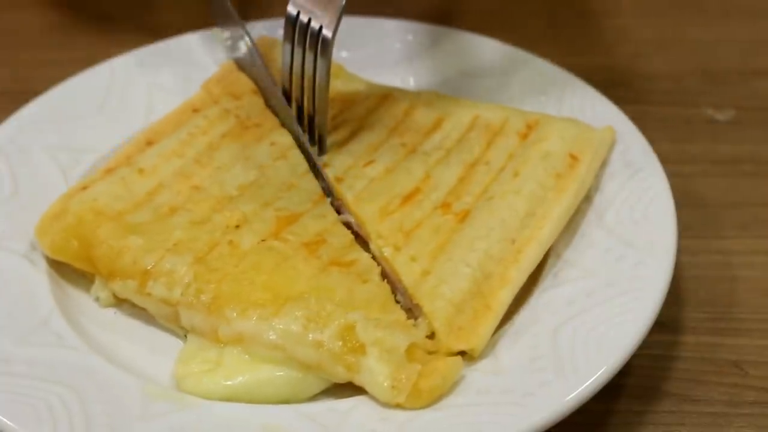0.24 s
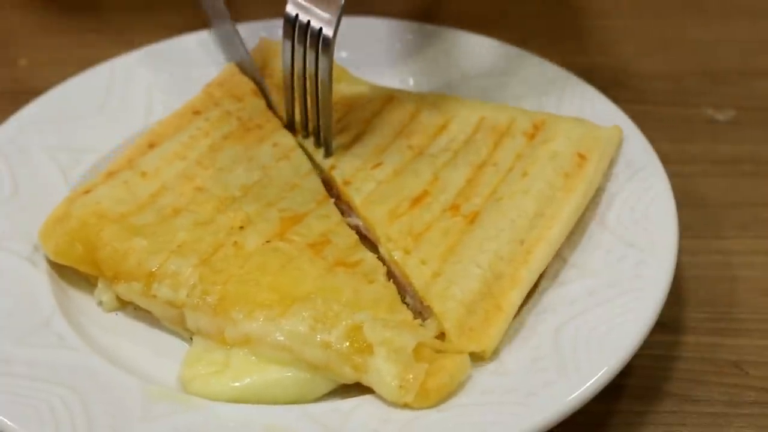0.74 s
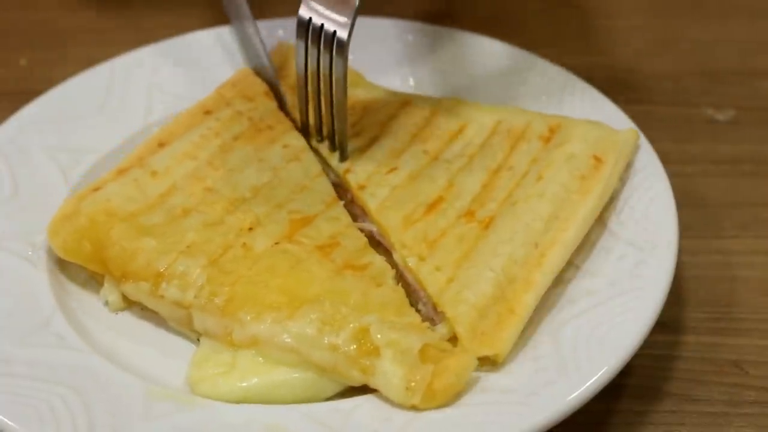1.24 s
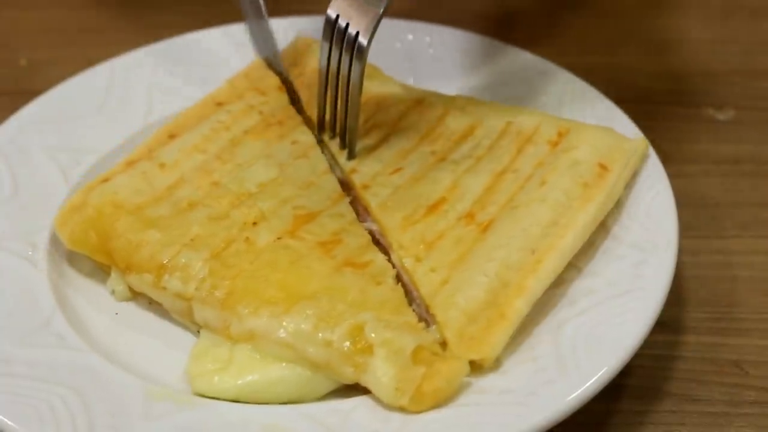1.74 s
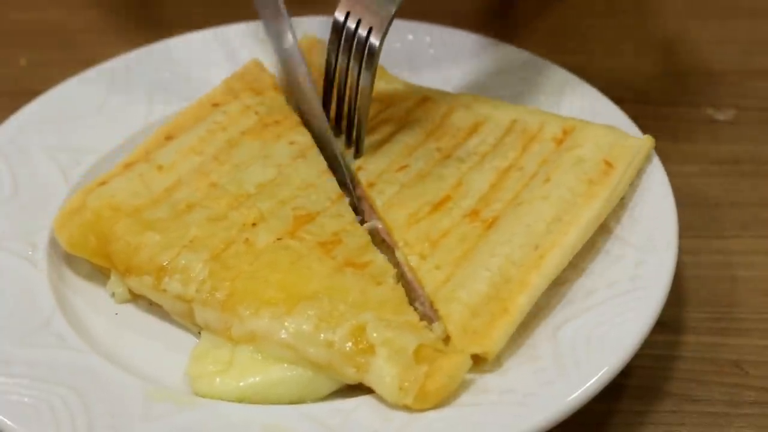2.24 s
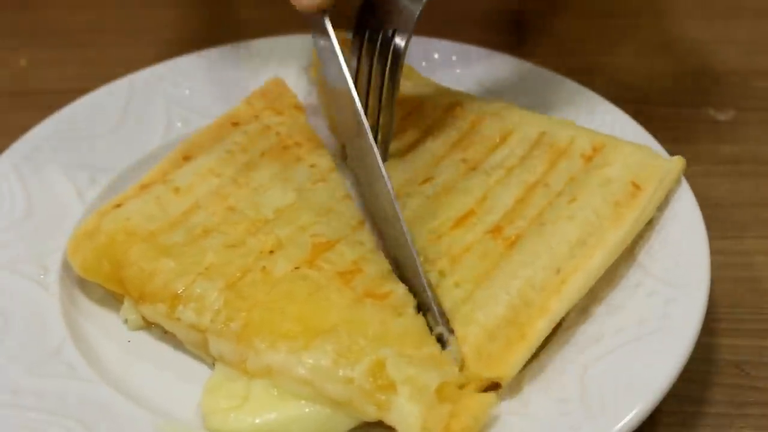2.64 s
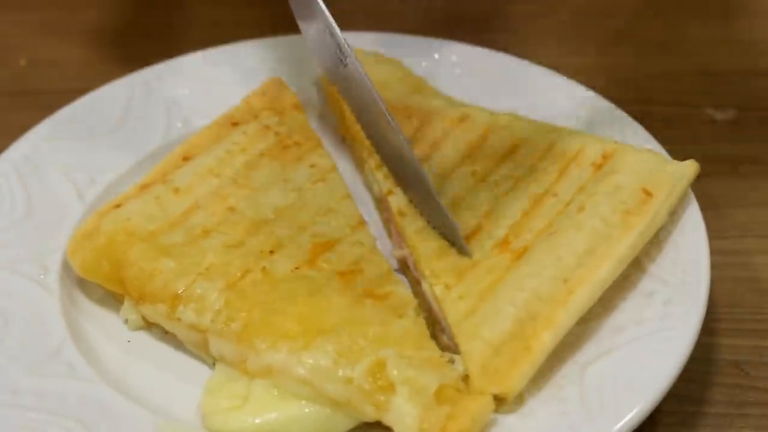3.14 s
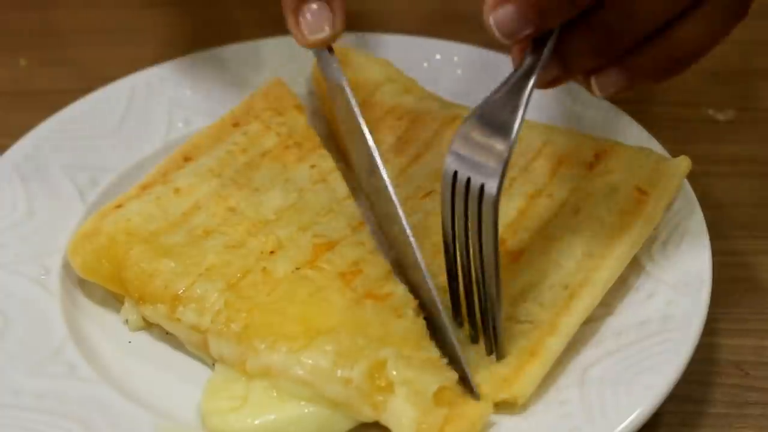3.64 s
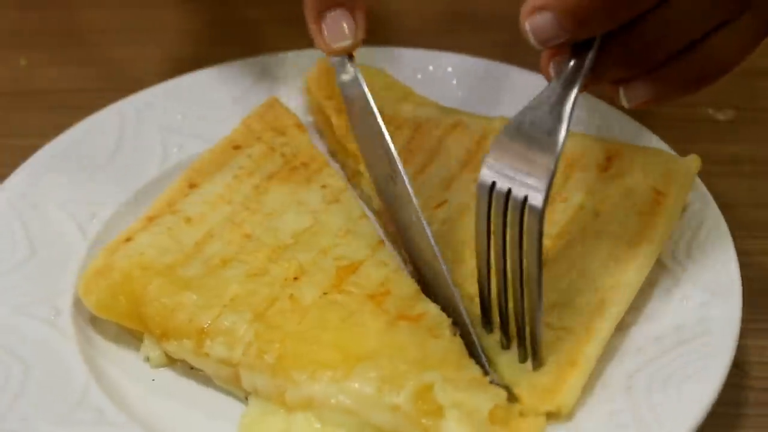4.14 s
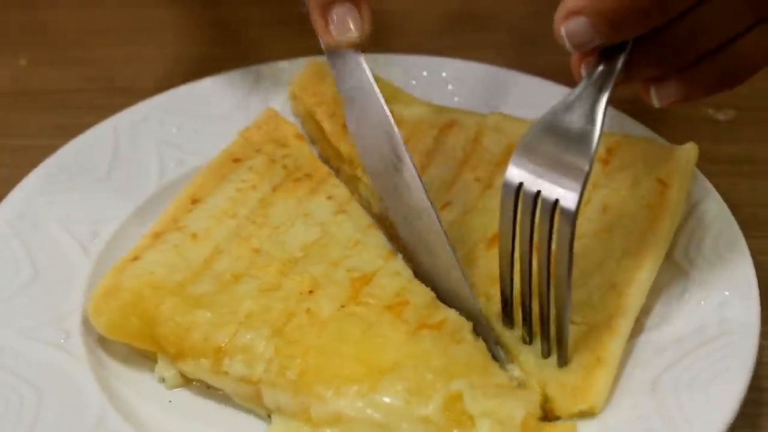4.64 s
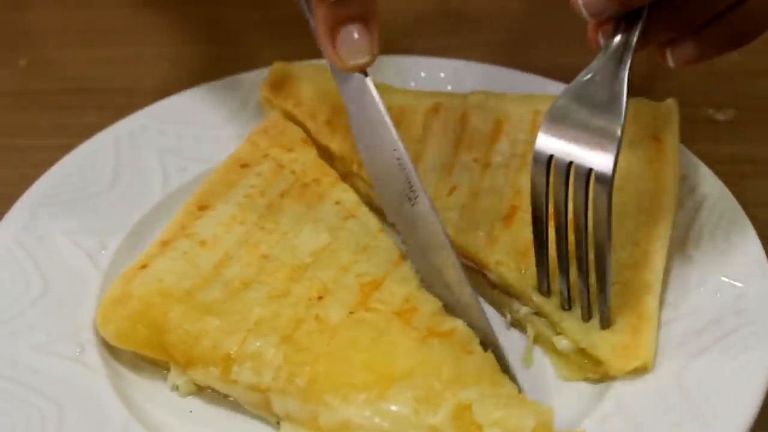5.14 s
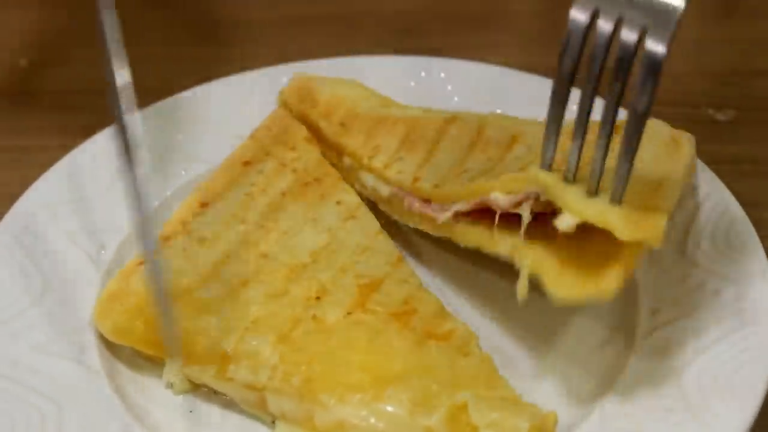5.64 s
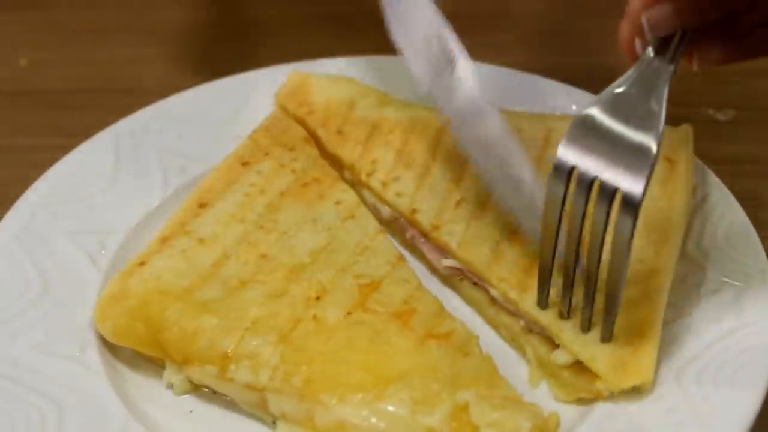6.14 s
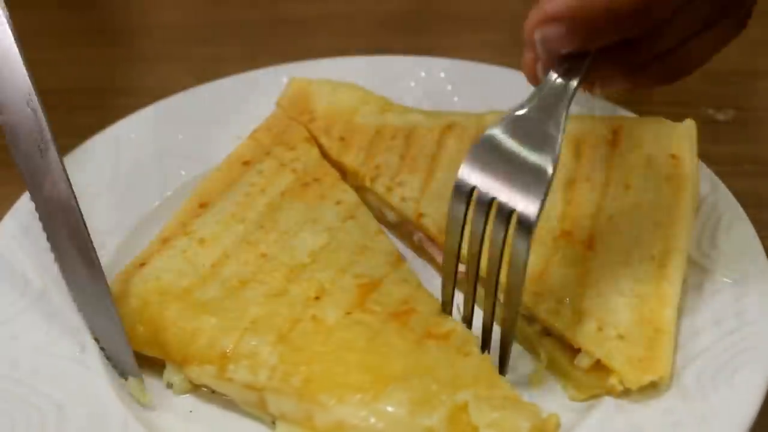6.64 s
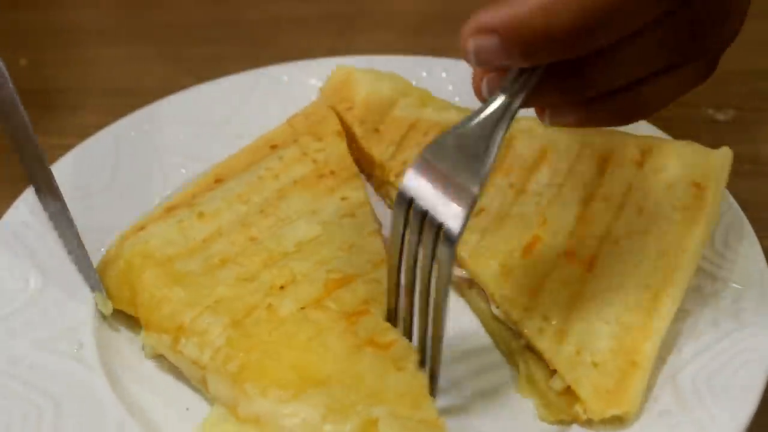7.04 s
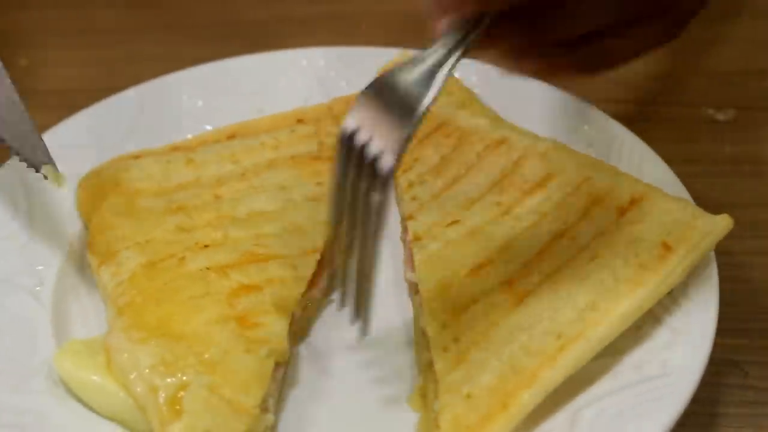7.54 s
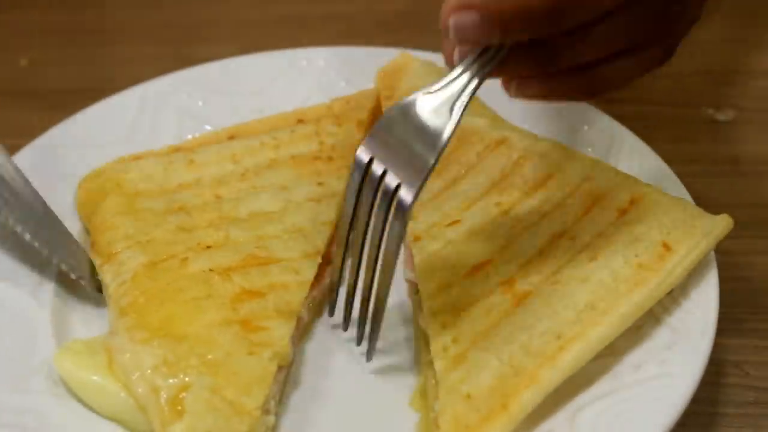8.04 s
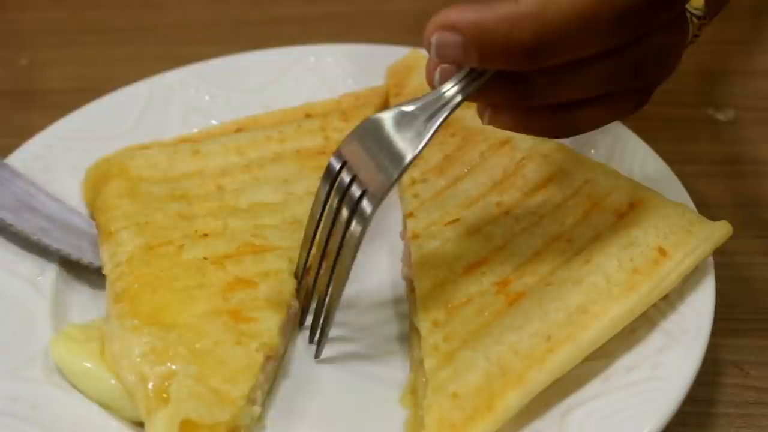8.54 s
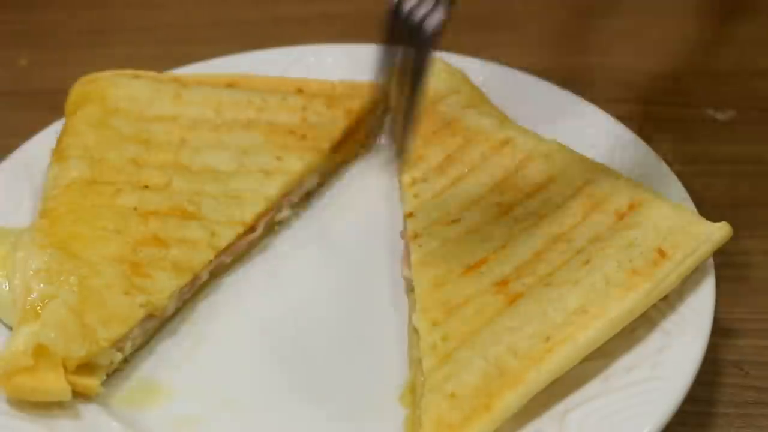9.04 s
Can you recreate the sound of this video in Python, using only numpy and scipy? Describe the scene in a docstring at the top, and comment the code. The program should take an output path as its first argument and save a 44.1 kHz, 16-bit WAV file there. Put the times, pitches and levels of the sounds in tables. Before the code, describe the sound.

Close cutlery clatters and scrapes on a plate as toasted bread is cut, then quieter rubs, taps and short squeaks in a hard-walled room.

```python
"""In a bare, ringing room, a table knife saws through a toasted sandwich on a ceramic plate while a fork holds it.
Then the halves are pushed apart. Rubbing dough and crackling crust are filtered noise with tiny clicks.
The blade knocks on the plate and knife and fork clink: each contact is a set of decaying modes with a short crack.
Knife or fork squeaks across the glaze as an unsteady pulse train; crust and cheese snap faintly as the filling parts.
One close microphone hears it all with a dense room tail, low rumble and hiss."""
import sys
import numpy as np
from scipy import signal
from scipy.fft import rfft, irfft, next_fast_len
from scipy.io import wavfile

SR = 44100
rng = np.random.default_rng(int(sys.argv[2]) if len(sys.argv) > 2 else 0)


def to_wav(sig):
    """Store sig (one row per channel, or 1-D mono) as 16-bit WAV at the path in sys.argv[1].

    Samples outside -1..1 are clipped; the rate is SR.
    """
    pcm = np.clip(np.atleast_2d(sig), -1, 1) * 32767
    pcm = np.round(pcm).astype(np.int16)
    wavfile.write(sys.argv[1], SR, pcm.T)  # frames by channels


N = 409248
TIME = np.arange(N) / SR

# knife strokes through the sandwich, levels before the mix in sawing():
# (start [s], length [s], rubbing [dB], pressure re rubbing [dB], crispness re rubbing [dB])
STROKES = [(-.04, 0.059, -41.5, 5, 5), (.04, 0.16, -53.5, -5, 1), (.26, 0.063, -43.5, -1, 6.5),
           (.52, 0.36, -49, -3, -4), (.71, .14, -42, -1.5, -6), (.92, 0.16, -53.5, 1.5, -2),
           (1.12, 0.28, -56, 2, -1), (1.47, 0.16, -44.5, -4, -59), (1.73, 0.15, -53.5, 7, 3.5),
           (1.9, 0.24, -53, 4.5, -7), (2.09, 0.13, -48.5, 0.5, -5.5), (2.25, 0.098, -57, -3, -10),
           (2.36, 0.2, -65.5, -4.5, 17), (2.565, 0.088, -47, -2.5, 4), (3.86, 0.18, -51, -23, -5),
           (4.09, 0.089, -45.5, -18, -1), (4.19, 0.16, -54, -6, -2.5), (4.35, 0.23, -45.5, -16, -1),
           (4.6, 0.12, -54, -12, -1), (4.72, 0.083, -51, 3, 1.5), (4.86, 0.18, -57, 0, 6.5),
           (5.04, 0.14, -59, 0, -1), (5.2, 0.054, -49.5, 4.5, 4.5), (5.29, 0.065, -61, 6, 4)]
# the sandwich pricked, lifted or shoved over the plate, levels before the mix in sawing():
# (start [s], length [s], rubbing [dB], pressure re rubbing [dB], crispness re rubbing [dB])
SHOVES = [(3.08, 0.046, -59.5, -1, 11.5), (3.71, 0.076, -67, 3, 4.5), (5.53, 0.39, -78.5, 7, -1),
          (6.75, 0.086, -46.5, -26, 8.5), (6.86, 0.17, -56.5, -20, 11.5), (7.22, 0.2, -57, 1.5, -1.5),
          (7.41, 0.084, -53, 5.5, -3.5), (7.5, 0.054, -61.5, 7, 5.5), (8.87, 0.045, -55.5, -6, -12),
          (8.94, 0.046, -71, -5, 4)]
# the blade sliding along the fork: (start [s], length [s], level before the mix in sawing() [dB])
SLIDES = [(.73, 0.089, -43), (1.08, 0.31, -58), (3.02, .03, -47), (3.1, 0.083, -47.5), (4.52, 0.04, -53)]
# the hands lean on the plate and the table rumbles: (start [s], length [s], level [dB])
LEANS = [(-.04, 0.1, -54.5), (.25, 0.1, -57.5), (.53, 0.079, -52.5), (.71, 0.16, -51), (1.03, 0.54, -60.5),
         (1.47, .07, -51), (1.62, 0.26, -58.5), (1.91, 0.35, -52), (3.86, 0.5, -63.5), (4.34, 0.36, -61.5),
         (4.72, 0.048, -53), (4.93, 0.41, -62)]
# spectra of the sawing layers, from table to blade: (frequency [Hz], relative level [dB])
RUMBLE_SPECTRUM = [(15, -13.5), (25, -8), (40, -4.5), (65, -3.5), (90, -12.5), (120, -18), (200, -43)]
THUD_SPECTRUM = [(70, -32.5), (120, -19), (160, 1.5), (200, -13), (270, 3), (420, -5), (700, -44)]
DOUGH_SPECTRUM = [(220, -28.5), (430, 4), (600, -1), (850, -1), (1300, -0.5), (1700, -8), (3000, -40.5)]
CRUST_SPECTRUM = [(900, -30.5), (1600, -11), (2000, 6), (2600, -1.5), (3200, -2.5), (4200, -1.5),
                  (5000, -20), (9000, -36.5)]
STEEL_SPECTRUM = [(3500, -29), (5500, 8), (6800, -1.5), (8500, -3.5), (10500, -3), (13000, -12.5),
                  (16000, -15)]

# In the contact tables, weight is a firm push that adds bass; edge is bare steel on glaze that adds treble.
# cutlery knocking on the plate: (time [s], level [dB], weight [dB], edge [dB], ring time [factor])
PLATE_KNOCKS = [(.0546, -37.5, -5, 8.5, 0.27), (.2638, -23.5, 1, -17, 0.78), (.2727, -26.5, 5, -11.5, 1.06),
                (.289, -34.5, 6, 11, 0.13), (.4964, -23, -1.5, -9.5, 0.65), (.5284, -23, 0, -7, 0.31),
                (.5475, -9.5, -8.5, -8.5, 0.69), (.5591, -22.5, 5, -1, 0.45), (.5714, -29, 7.5, -5, 0.3),
                (.7093, -14, -5, -7, 0.83), (.7143, -9, -2.5, -12.5, 1.05), (.7267, -10, -4, -6.5, 0.74),
                (.734, -19.5, -11.5, -3.5, 0.56), (.7417, -21, 2, -1.5, 0.39), (.7516, -26, -8, 6, 0.43),
                (.8011, -21.5, -10.5, -2, 0.15), (.8158, -20.5, 4, 0.5, 0.33),
                (.8267, -13.5, -5.5, -5.5, .45), (.9873, -33, -5, -2, 0.44), (1.2242, -32, -5.5, -14, 0.27),
                (1.4568, -24.5, -3, -4.5, 0.46), (1.4753, -38, 5, 4, 1.8), (1.4918, -34, -6, 4, 0.3),
                (1.5047, -38.5, 8.5, 11, 0.49), (1.5186, -54, 2, 23, .48), (1.5631, -19, -5, 1.5, 0.32),
                (1.7909, -26, 0, 3, 0.56), (1.8244, -44, 16, 13, 0.99), (2.066, -23, 2.5, 12.5, .9),
                (2.0761, -22, 0, 3.5, 0.62), (2.0933, -27, -11, -18, 0.95), (2.1378, -23.5, 1.5, -2, 0.36),
                (2.1654, -25, 3, -2, 0.36), (2.1732, -48, 12, 19, .48), (3.8651, -73, 33.5, -4, 0.65),
                (3.9335, -51, 17.5, 9.5, 0.96), (3.962, -50, -6.5, 4.5, 2), (4.0057, -54, 11.5, 9.5, 1.6),
                (4.0909, -61, 17, 3, 0.43), (4.3352, -58.5, 18.5, 9.5, 0.42),
                (4.3782, -49.5, 14.5, -5.5, .29), (4.3858, -36.5, 1.5, 5, 0.44), (4.4114, -38, 7, 0, 0.42),
                (4.432, -42, -17, -13, 7.4), (4.4467, -39, -7, 7, 0.86), (4.4847, -36.5, -1, 4, 2.8),
                (5.4375, -56.5, 2, 9, .6), (6.7362, -21, -4.5, 3.5, 2.47), (6.7589, -34, -17, 0.5, 0.87),
                (6.8292, -33.5, -10, -11, 3.7), (6.8812, -38, 1, -13, 1.1), (6.926, -36, -8, -27, 3.3),
                (7.0112, -36.5, -11, -18, 2), (7.1692, -51.5, 8.5, 0.5, 1.1), (7.319, -50.5, 2, 0, 0.49),
                (8.9865, -62, 14.5, -11, 2)]
# faint snaps of crust and cheese as the filling pulls apart: (time [s], level [dB])
FILLING_SNAPS = [(5.6242, -66.5), (5.8757, -60), (6.087, -59), (6.2023, -62), (6.3216, -59), (6.3834, -63),
                 (6.4058, -62), (6.517, -60.5)]
# the blade clinking against fork or rim: (time [s], level [dB], weight [dB], edge [dB], ring time [factor])
BLADE_CLINKS = [(1.3124, -40, 0, -2, .27), (2.5227, -44.5, -2.5, -8.5, .6), (2.8703, -31.5, 7.5, 4, 1.1),
                (3.0316, -48.5, 8.5, 11, 0.6), (3.138, -65, 0, 12, .4), (4.1999, -47.5, 4, -18, .68),
                (4.5295, -22.5, -1, 0.5, 0.78), (4.5696, -49, -4, 2, .74), (4.7284, -23, -2.5, -2.5, 0.83),
                (8.6145, -50, 4.5, 8, 1.6), (8.8295, -58, 0, 0, .38)]
# the fork meeting knife or plate: (time [s], level [dB], weight [dB], edge [dB], ring time [factor])
FORK_TAPS = [(2.8701, -21.5, -10.5, -2, 0.52), (6.7587, -21, 2.5, -0.5, 0.51), (8.2427, -29.5, 3.5, 4, 1)]
# light ticks of a steel tip: (time [s], level [dB], weight [dB], edge [dB], ring time [factor])
TIP_TICKS = [(1.0577, -50, -5.5, -2.5, 0.38), (2.5568, -44, 6.5, -5.5, 1.04),
             (4.6467, -40.5, -0.5, -2.5, 0.39), (4.6634, -51, 7, 4, 2.6), (4.9289, -40, 0, 0.5, 0.92),
             (5.1973, -40, -2.5, 1, 1.16), (5.2382, -56.5, 14, -4, 0.63), (5.3522, -50.5, -10, -9, 1.1)]
# modes of each object: (frequency [Hz], relative level [dB], t60 before the ring factor [s])
PLATE_MODES = [(153, -26.5, 0.081), (287, -32, 0.24), (324, -23.5, 0.18), (370, -23.5, 0.066),
               (650, -23, .02), (798, -16.5, 0.093), (1000, -11.5, 0.028), (1394, -20, .06),
               (1971, -13.5, 0.091), (2450, -8, .018), (2610, -9.5, 0.02), (2750, -17, 0.0043),
               (3179, 0, 0.051), (3299, 1.5, 0.015), (3560, -14, 0.075), (3930, -27, 0.031),
               (4564, -12.5, 0.35), (4244, -14.5, .02), (5873, -23.5, 0.042), (6110, -20, .1),
               (7020, -15.5, .008), (7980, -22, 0.12), (8430, -27, 0.013), (9830, -27, 0.084),
               (10680, -28.5, .03), (12200, -37, .08), (13020, -34, .04), (13420, -39.5, .04),
               (15600, -42, .04)]
BLADE_MODES = [(362, -14.5, 0.048), (630, -1, 0.036), (1110, -10, .03), (1551, -37.5, 0.036),
               (1972, -33, 0.039), (2610, -15, 0.023), (3150, -6, 0.051), (3310, -5.5, 0.014),
               (3540, -2.5, 0.027), (3550, 5.5, 0.0091), (4100, -5, 0.02), (4350, -30.5, 0.37),
               (5980, -14, 0.033), (6450, -13, 0.013), (7330, -14, 0.039), (8100, -26, 0.033),
               (8500, -32, .03), (10030, -16, 0.033), (10700, -24.5, 0.023), (11960, -32.5, 0.023),
               (12820, -20, .02)]
FORK_MODES = [(287, -17, 0.015), (478, -8.5, 0.029), (1674, -3.5, 0.045), (1620, -3.5, 0.0057),
              (1965, 5.5, 0.019), (2356, 4, 0.039), (2500, 1.5, 0.0084), (2660, 10, 0.0054),
              (2660, -32.5, 0.013), (3240, -4, .01), (3680, -24, 0.0016), (3712, 9, 0.055),
              (3850, 4.5, 0.015), (4010, -15, 0.019), (4200, -0.5, 0.017), (4930, -24, .012),
              (5530, -7, 0.018), (5890, -0.5, 0.011), (6200, -21.5, .008), (7270, 4.5, 0.033),
              (7780, -45, 0.021), (9730, -12.5, 0.055), (10500, -15.5, 0.013), (12800, -14, .015)]
TIP_MODES = [(440, -3.5, 0.1), (758, -3, 0.047), (1240, 3.5, 0.037), (1582, -9.5, 0.1), (1975, 4, 0.045),
             (2470, -4.5, 0.038), (3140, 0.5, 0.059), (3620, 3.5, 0.024), (4480, 8, 0.37),
             (4970, 2.5, 0.016), (5830, 4, 0.023), (7110, 3.5, 0.0063), (8380, -1.5, 0.013),
             (9860, -15.5, 0.12), (10280, -13.5, 0.021), (11300, -10.5, .02), (12830, -17, .02)]
# bands in which the balance of a contact is set: (low edge [Hz], high edge [Hz])
BANDS = [(130, 1250), (1250, 2800), (2800, 4200), (4200, 5200), (5200, 9000), (9000, 15500)]
# an ordinary contact on each object: (level in each of the six BANDS [dB])
PLATE_VOICE_DB = [-12.5, -4.5, -1, -10.5, -17.5, -24.5]
BLADE_VOICE_DB = [-11.5, -13.5, -0.5, -23, -4.5, -12.5]
FORK_VOICE_DB = [-18, -2, 1, -15, -9.5, -15.5]
TIP_VOICE_DB = [2.5, 3, 1, 0.5, 1, -4]
# how much weight, edge and contact spot reach each of the six BANDS: (share [factor])
WEIGHT_SHARE = [1, .75, 0, 0, 0, 0]
EDGE_SHARE = [0, 0, 0, .8, 1, 1]
SPOT_SHARE = [0, 0, 0, 1, 0, 0]
# the tools wander nearer to or farther from where the plate's high ring is struck best:
# (time [s], level of that ring [dB])
CONTACT_SPOT = [(.27, -7.5), (.5, 1.5), (.72, 4), (1.05, 8.5), (1.45, -5), (2.07, -8), (2.87, -9),
                (4.5, -12), (4.7, 0.5), (5.3, -3), (6.75, -12.5), (8.24, 2.5)]
# spectrum of the crack in a contact: (frequency [Hz], relative level [dB])
CRACK_SPECTRUM = [(130, -8.5), (300, 13), (520, 8.5), (950, -1), (2000, 0), (4000, -3), (5500, -10),
                  (9000, -15), (15000, -33.5)]
# the free rim sings on after a contact: (frequency [Hz], gain at resonance [dB], t60 [s])
RIM_MODES = [(1981.4, -3, 0.31), (3166, -5, 0.15), (6175, 11, 0.67), (7400, -1.5, 0.51), (9831, -0.5, .4)]

# steel slipping on the glaze:
# (start [s], length [s], first slip rate [Hz], last slip rate [Hz], level [dB])
SQUEAKS = [(4.655, 0.0134, 855, 803, -42), (6.769, .02, 778, 850, -33), (6.807, .075, 823, 862, -63),
           (6.886, .068, 904, 765, -41), (6.963, .052, 799, 751, -42)]
# spectrum of the squeak: (frequency [Hz], relative level [dB])
SQUEAK_SPECTRUM = [(300, -24), (780, 2), (1600, 7.5), (2300, 15), (3100, -10), (3800, 9.5), (4800, -35),
                   (6200, -20), (7400, -5), (9000, -33), (15000, -39)]

# spectrum of the room tail: (frequency [Hz], relative level [dB])
ROOM_COLOUR = [(60, -5), (160, 7), (400, -1), (1000, 3.5), (2000, -16), (3200, -4.5), (4500, -3),
               (7000, -11), (10000, -3), (15000, -15.5)]
# decay of the room: (frequency [Hz], t60 [s])
ROOM_T60 = [(100, 0.8), (400, 0.28), (1500, 0.86), (3500, 0.63), (7000, .65), (14000, 0.4)]
# spectra of the background, centre and side: (frequency [Hz], relative level [dB])
FLOOR_SPECTRUM = [(12, -31.5), (20, 7.5), (49, -3), (285, -10), (542, -12.5), (678, -17), (1190, -20),
                  (1440, -16), (1710, -19.5), (2820, -20.5), (3070, -21.5), (4810, -24), (14700, -26.5),
                  (16000, -23.5)]
SIDE_SPECTRUM = [(20, 14.5), (60, 12.5), (150, 6.5), (500, 1.5), (2000, -6.5), (8000, -2), (16000, -1.5)]


def undb(db):
    """Turn decibels into gain."""
    return 10 ** (np.asarray(db) / 20)


def unit(x):
    """Scale to rms 1."""
    return x / np.sqrt(np.mean(x ** 2) + 1e-20)


def at(points, hz):
    """Read (frequency, value) points on a log-frequency axis."""
    f, value = np.transpose(points)
    return np.interp(np.log(np.maximum(hz, 1)), np.log(f), value)


def colour(x, points):
    """Shape a signal's spectrum with (frequency, dB) points."""
    size = next_fast_len(len(x))
    gain = undb(at(points, np.fft.rfftfreq(size, 1 / SR)))
    return irfft(rfft(x, size) * gain, size)[:len(x)]


def band(x, lo, hi, order=2):
    """Causal band-pass."""
    return signal.sosfilt(signal.butter(order, [lo, hi], "band", fs=SR, output="sos"), x)


def decay(t, t60):
    """Exponential fade that falls 60 dB in t60 seconds."""
    return np.exp(-np.log(1000) * t / t60)


def walk(rate):
    """Random wander with a spread near 1, moving in straight lines between `rate` chance values a second."""
    knots = rng.standard_normal(2048)
    return 1.1 * np.interp(TIME * rate, np.arange(len(knots)), knots)


def sawing():
    """The teeth catch and let go: dough rubs, crust breaks, the table thuds, steel slides on steel."""
    dough_gain, thud_gain, crust_gain = rubbing(STROKES) + rubbing(SHOVES)
    # the blade's own hiss follows the crust in every stroke and shove
    steel_gain = effort(SLIDES) + undb(-16) * crust_gain
    catch = undb(2.0 * walk(45))
    rumble = unit(colour(rng.standard_normal(N), RUMBLE_SPECTRUM)) * effort(LEANS)
    thud = unit(colour(grains(rate=1000, spread_db=-4.0, bed=0.7), THUD_SPECTRUM)) * thud_gain
    dough = unit(colour(grains(rate=500, spread_db=4, bed=0.5), DOUGH_SPECTRUM)) * dough_gain
    breaks = unit(colour(grains(rate=550, spread_db=3.5, bed=0.5), CRUST_SPECTRUM))
    # the teeth reach through the crust to the glaze
    crust = (breaks + undb(-5.5) * plate_ring(breaks)) * crust_gain
    steel = unit(colour(grains(rate=900, spread_db=4, bed=0.6), STEEL_SPECTRUM)) * steel_gain
    strokes = undb(-5.0) * thud + undb(-4.0) * dough + undb(-5) * crust + undb(-3.5) * steel
    return rumble + catch * strokes


def rubbing(table):
    """Gains of dough, thud and crust: all three follow the same movements."""
    dough = thud = crust = 0
    for start, length, rubbing_db, pressure_db, crisp_db in table:
        move = effort([(start, length, rubbing_db)])
        dough = dough + move
        thud = thud + move * undb(pressure_db)
        crust = crust + move * undb(crisp_db)
    return np.array([dough, thud, crust])


def effort(rows):
    """Gain through time of a series of (start, length, dB) hand movements."""
    return sum(undb(db) * gesture(start, length, attack_s=0.029, release_s=0.018) for start, length, db in rows)


def gesture(start, length, attack_s, release_s):
    """A movement gathers speed in a straight ramp, holds it and dies away exponentially."""
    rise = np.clip((TIME - start) / attack_s, 0, 1)
    return rise * np.exp(-np.clip((TIME - start - length) / release_s, 0, 40))


def grains(rate, spread_db, bed):
    """Tiny fractures of unequal size, `rate` a second on average, over a bed of smooth rubbing."""
    happens = rng.random(N) < rate / SR
    clicks = happens * undb(spread_db * np.minimum(rng.exponential(size=N), 5))
    return unit(unit(clicks) + bed * rng.standard_normal(N))


def plate_ring(x):
    """The plate's longer-lived modes, kept ringing by a steady scrape."""
    t = np.arange(SR // 3) / SR
    response = sum(undb(db) * np.sin(2 * np.pi * hz * t) * decay(t, t60)
                   for hz, db, t60 in PLATE_MODES if t60 > 0.05)
    return unit(signal.fftconvolve(x, response)[:N])


def blows(table, modes, voice_db, crack_db, crack_t60, scatter_db, detune, contact_s):
    """Each contact rings the object's modes with a short crack; its weight lifts the bass, its edge the treble."""
    out = np.zeros(N + SR)
    t = np.arange(SR // 3) / SR
    attack = SR // 170  # samples over which loudness is set, about 6 ms
    hz, mode_db, t60 = np.transpose(modes)
    # the push builds up over contact_s, about a millisecond or less
    push = np.sin(np.pi / 2 * np.minimum(t / contact_s, 1)) ** 2
    for s, level_db, weight_db, edge_db, ring in table:
        spot_db = np.interp(s, *np.transpose(CONTACT_SPOT))
        balance_db = np.dot([weight_db, edge_db, spot_db], [WEIGHT_SHARE, EDGE_SHARE, SPOT_SHARE])
        band_db = level_db + np.array(voice_db) + balance_db
        pitch, size, sign = rng.standard_normal((3, len(hz)))
        # grip and food shift the heavily damped modes most at each contact
        f = hz * (1 + detune * pitch * np.minimum(1, 0.014 / t60) ** 2)
        life = t60 * max(ring, 0.2)
        # short-lived modes start stronger
        gain = np.sign(sign) * undb(mode_db + scatter_db * size) / np.sqrt(np.minimum(life, 0.08))
        ringing = gain[:, None] * np.cos(2 * np.pi * f[:, None] * t) * decay(t, life[:, None]) * push
        noise = colour(rng.standard_normal(len(t)), CRACK_SPECTRUM) * decay(t, crack_t60)
        crack = noise * undb(crack_db) * np.std(ringing.sum(0)[:attack]) / np.std(noise[:attack])
        start = int(s * SR)
        for (lo, hi), db in zip(BANDS, band_db):
            in_band = (hz >= lo) & (hz < hi)
            part = ringing[in_band].sum(0) + band(crack, lo, hi, order=3)
            part = band(part, lo * 0.8, hi * 1.2)
            out[start:start + len(t)] += part * undb(db) / np.std(part[:attack])
    return out[:N]


def plate_contacts():
    """Cutlery knocks and the faint filling snaps both sound through the plate's own modes."""
    return blows(PLATE_KNOCKS + filling_snaps(), PLATE_MODES, PLATE_VOICE_DB, crack_db=-15, crack_t60=0.022,
                 scatter_db=1.5, detune=0.013, contact_s=0.0006)


def filling_snaps(weight_db=5, edge_db=1, ring=0.3):
    """Faint snaps of crust and cheese as the filling pulls apart, all with the same balance and short ring."""
    return [(s, db, weight_db, edge_db, ring) for s, db in FILLING_SNAPS]


def blade_clinks():
    """The blade meets fork or rim and its steel rings briefly."""
    return blows(BLADE_CLINKS, BLADE_MODES, BLADE_VOICE_DB, crack_db=-9, crack_t60=0.015,
                 scatter_db=2, detune=0.003, contact_s=0.0005)


def fork_taps():
    """The fork meets knife or plate with a slower push and a longer crack."""
    return blows(FORK_TAPS, FORK_MODES, FORK_VOICE_DB, crack_db=-5, crack_t60=0.05,
                 scatter_db=2, detune=0.004, contact_s=0.0012)


def tip_ticks():
    """A steel tip touches lightly and sets off a small cluster of modes."""
    return blows(TIP_TICKS, TIP_MODES, TIP_VOICE_DB, crack_db=-5.5, crack_t60=0.025,
                 scatter_db=2, detune=0.015, contact_s=0.0008)


def rim(x):
    """Contacts and sawing leak into the lightly damped bending modes of the plate's rim."""
    t = np.arange(SR) / SR
    response = 0
    for hz, db, t60 in RIM_MODES:
        fade = decay(t, t60)
        # this scaling makes the gain at resonance equal to db
        response = response + undb(db) * 2 * fade / fade.sum() * np.cos(2 * np.pi * hz * t)
    return signal.fftconvolve(x, response)[:N]


def squeak(jitter=0.016, flutter_db=3.0, rasp_db=-10):
    """Knife or fork sticks and slips on the glaze: an unsteady pulse train."""
    glides = []
    for s, length, first, last, _ in SQUEAKS:
        glides += [(s, first), (s + length, last)]
    hz = np.interp(TIME, *np.transpose(sorted(glides)))
    phase = 2 * np.pi * np.cumsum(hz * (1 + jitter * walk(200))) / SR
    slips = sum(np.cos(k * phase) for k in range(1, 15))
    rasp = undb(rasp_db) * rng.standard_normal(N)
    tone = unit(colour(unit(slips) + rasp, SQUEAK_SPECTRUM))
    touching = sum(undb(db) * gesture(s, length, attack_s=0.016, release_s=0.019)
                   for s, length, _, _, db in SQUEAKS)
    return tone * touching * undb(flutter_db * walk(90))


def room(x, wet_db=-1.0, first_s=0.003, build_s=0.01):
    """Hard walls return a dense noise tail whose decay time and colour vary with frequency."""
    t = np.arange(SR) / SR
    noise = rfft(rng.standard_normal(SR))
    octave = np.log2(np.maximum(np.arange(len(noise)), 1))
    centres = np.arange(6, 15)  # powers of two, 64 Hz to 16 kHz
    tail = 0
    for centre, pick in zip(centres, np.eye(len(centres))):
        t60 = at(ROOM_T60, 2. ** centre)
        part = irfft(noise * np.interp(octave, centres, pick), SR) * undb(at(ROOM_COLOUR, 2. ** centre))
        # equal energy for every decay time
        tail = tail + part * decay(t, t60) * np.sqrt(2 * np.log(1000) / (t60 * SR))
    tail = tail * np.clip((t - first_s) / build_s, 0, 1)
    return undb(wet_db) * signal.fftconvolve(x, tail)[:N]


def background(mid_db=-61.5, side_db=-68):
    """Low room rumble and microphone hiss in the centre, plus a little noise of opposite sign left and right."""
    mid = unit(colour(rng.standard_normal(N), FLOOR_SPECTRUM))
    side = unit(colour(rng.standard_normal(N), SIDE_SPECTRUM))
    return undb(mid_db) * mid + undb(side_db) * side * np.array([[1], [-1]])


def scene():
    """Plate, cutlery and sandwich straight ahead of the microphone, in the room."""
    near = sawing() + plate_contacts() + blade_clinks() + fork_taps() + tip_ticks()
    near = near + rim(near) + squeak()
    return near + room(near) + background()


def record(dry):
    """The recorder thins the deepest bass, clips at full scale and cuts the top."""
    low_cut = signal.butter(1, 48, "high", fs=SR, output="sos")
    top_cut = signal.ellip(10, 0.2, 85, 15800, fs=SR, output="sos")
    thinned = signal.sosfilt(low_cut, dry)
    return signal.sosfilt(top_cut, np.clip(thinned, -1, 1))


dry = scene()
out = record(dry)
to_wav(out)
```